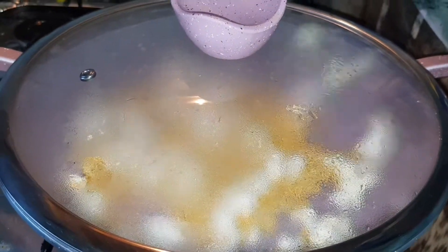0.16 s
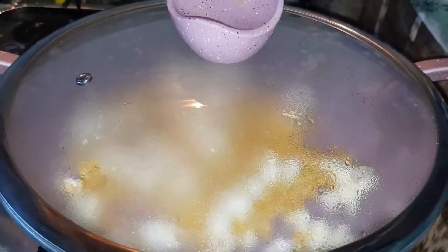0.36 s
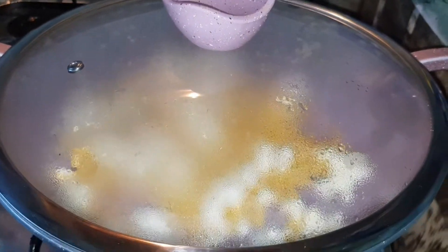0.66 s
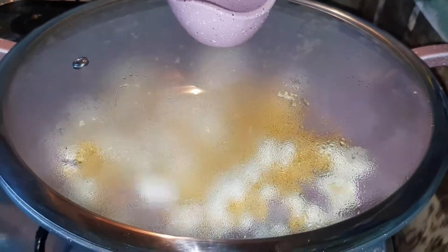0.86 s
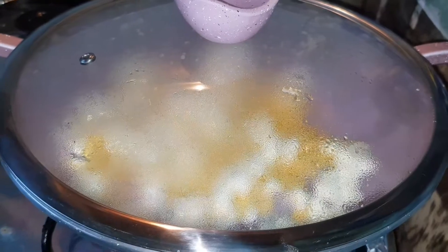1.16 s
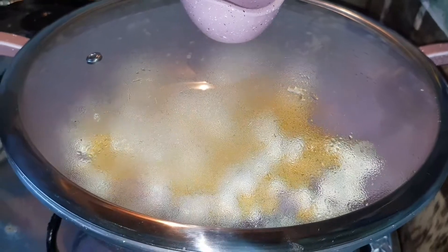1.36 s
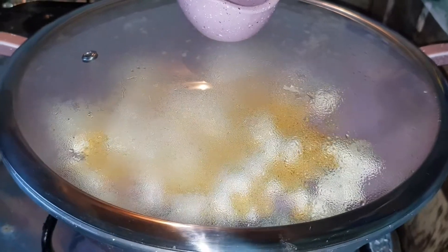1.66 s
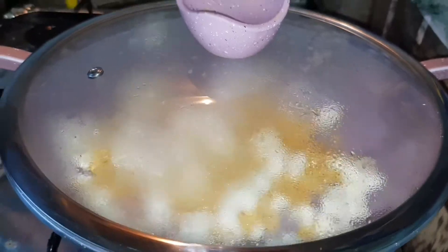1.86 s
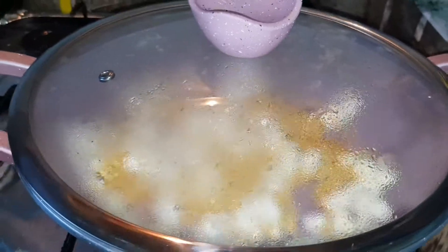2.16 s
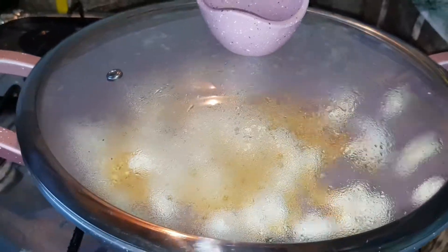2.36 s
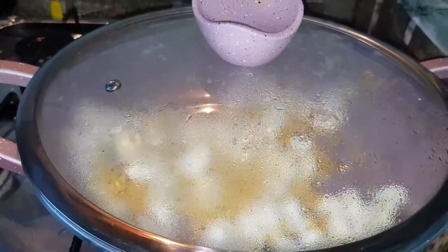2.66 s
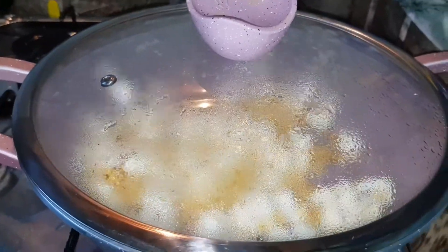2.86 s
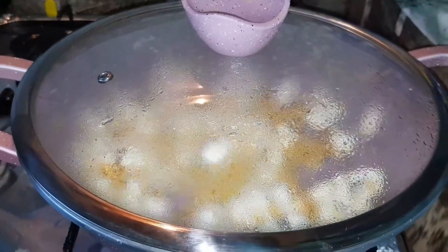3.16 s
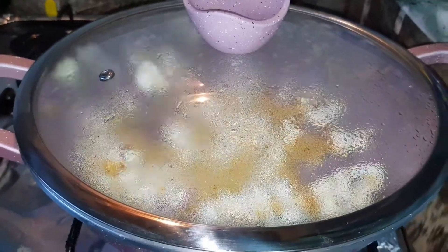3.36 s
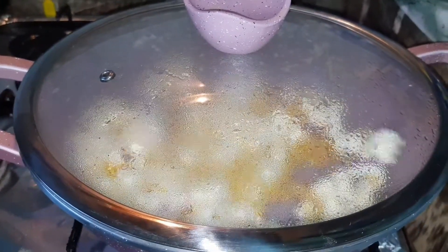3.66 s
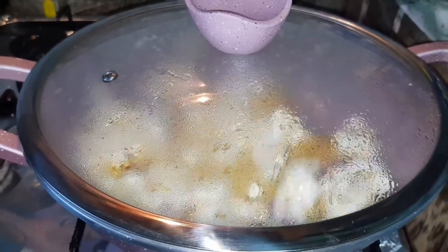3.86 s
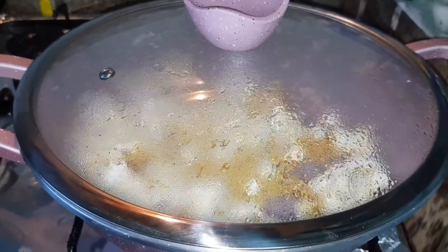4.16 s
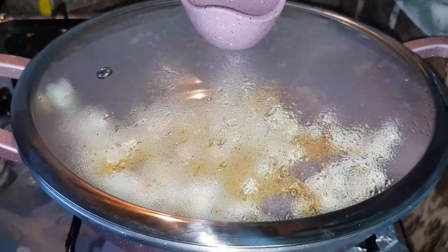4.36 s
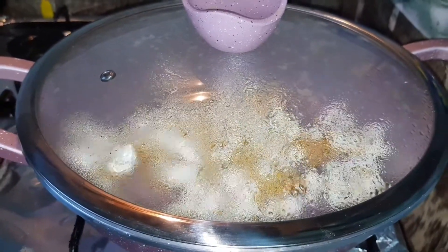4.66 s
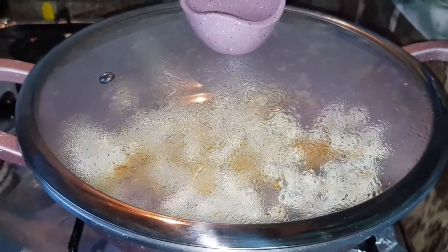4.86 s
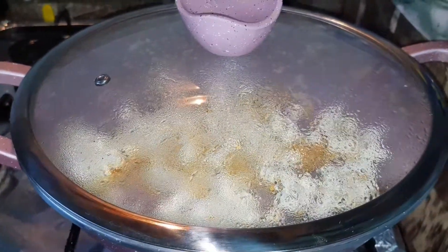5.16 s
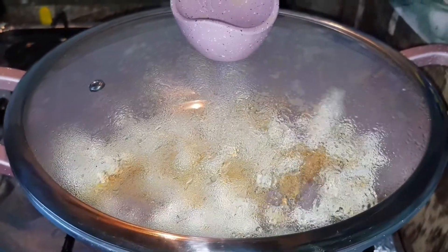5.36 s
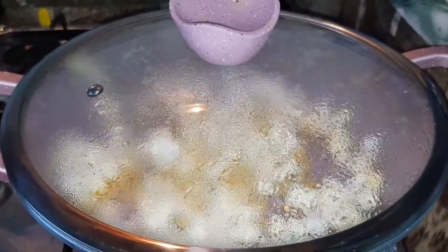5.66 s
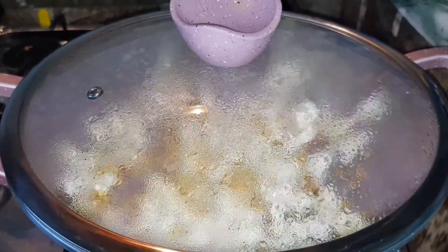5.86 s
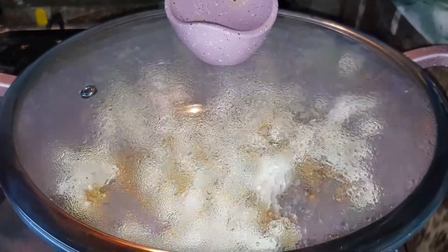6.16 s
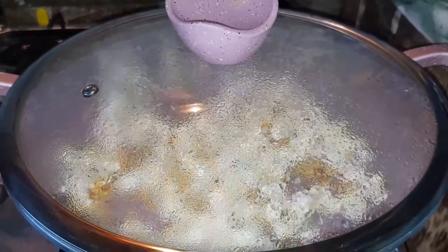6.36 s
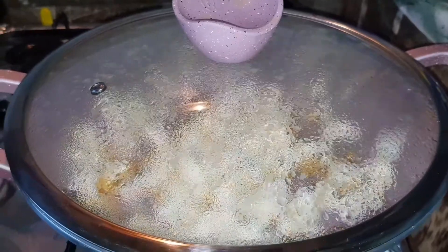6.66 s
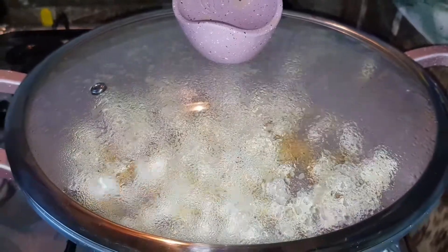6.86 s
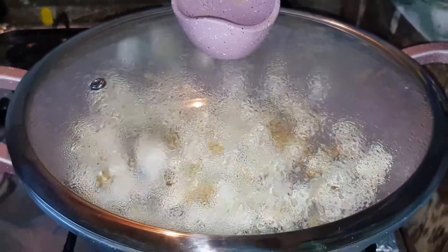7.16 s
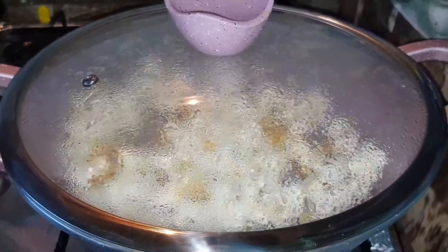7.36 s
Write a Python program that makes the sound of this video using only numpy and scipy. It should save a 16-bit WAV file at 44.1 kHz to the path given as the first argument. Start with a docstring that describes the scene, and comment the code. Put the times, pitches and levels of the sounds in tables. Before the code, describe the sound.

Popcorn pops under a glass lid over a hissing gas stove, scattered at first, then thickening into crowded volleys with sizzle and knocks.

```python
"""Popcorn in a pan under a glass lid in a small kitchen, heard by a phone close by, over a steady gas stove.
A turbulent flame rumbles and oil hisses throughout; lone pops, torn hulls ringing pan and air, come first.
A faint low tone slides down among them; then pops thicken into volleys while the sizzle, shaped noise, swells.
Filtered-noise squeaks and dry snaps join in, kernels clatter on the heap, and modal knocks ring lid and wall.
"""
import sys
import numpy as np
from scipy import signal
from scipy.fft import rfft, irfft, next_fast_len
from scipy.io import wavfile

SR = 44100
rng = np.random.default_rng(int(sys.argv[2]) if len(sys.argv) > 2 else 0)


def to_wav(s):
    """Save 16-bit WAV."""
    ch = np.atleast_2d(s).T  # columns
    pcm = np.round(np.clip(ch, -1, 1) * 32767)  # PCM
    wavfile.write(sys.argv[1], SR, pcm.astype(np.int16))


N = 331632
TAIL = 17640  # samples given to each short sound: 0.4 s
PORT_NULL_HZ = 1340  # above this the ports hear unrelated reflections


def undb(db):
    """Logarithmic level: decibels to amplitude gain."""
    return 10 ** (np.asarray(db) / 20)


def rfft_hz(size):
    """Discrete Fourier analysis: frequencies of a spectrum's bins."""
    return np.arange(size // 2 + 1) * SR / size


def colour(points, f):
    """Spectral envelope: gain of a (Hz, dB) outline on a log-frequency axis."""
    hz, db = np.transpose(points)
    return undb(np.interp(np.log(f + 1), np.log(hz), db))


def unit(x):
    """Power normalization: each stereo sound scaled to rms 1."""
    return x / np.sqrt(np.mean(x ** 2, axis=(-2, -1), keepdims=True))


def fade(t, t60):
    """Exponential damping: 60 dB of decay in t60, scaled to unit energy."""
    env = np.exp(-np.log(1000) * t / t60)
    return env / np.linalg.norm(env)


def at_ports(spectra, f, bass_likeness=0.96):
    """Diffuse-field coherence: two unrelated spectra become two port signals alike in the bass only."""
    relative_f = f / PORT_NULL_HZ
    alike = bass_likeness * np.sinc(relative_f) / (1 + (relative_f / 2) ** 2)
    mid = spectra[..., 0, :] * np.sqrt(1 + alike)
    side = spectra[..., 1, :] * np.sqrt(1 - alike)
    return np.stack([mid + side, mid - side], axis=-2)


def place(times, sounds):
    """Linear superposition: stereo sounds added at their times."""
    out = np.zeros((2, N + 2 * TAIL))
    for s, sound in zip(times, sounds):
        start = max(int(s * SR), 0)
        out[:, start:start + TAIL] += sound
    return out[:, :N]


# broad colour of flame and hot oil: (frequency [Hz], relative level per Hz [dB])
STOVE_COLOUR = [(15, -41), (25, -14), (86, -0.5), (261, 2), (352, -2), (437, -1.5), (637, -3), (1010, -4),
                (1220, -7), (1320, -6), (1780, -9.5), (2460, -18), (4820, -8.5), (8050, -19), (15800, -13)]
# hiss bands of the gas jet: (frequency [Hz], width [Hz], gain [dB])
JET_BANDS = [(2850, 590, 6), (4740, 36, 5.5), (11530, 220, 5.5)]
# how hard the oil sizzles: (time [s], relative level [dB])
SIZZLE_COURSE = [(0, -2), (.6, -2), (1.45, -0.5), (1.62, 3.5), (1.8, 0.5), (2.2, 4), (2.7, 9.5), (3.3, 4),
                 (3.75, 1), (4.6, 4), (5.1, 0), (5.5, 3), (6.3, 3), (7.5, 2.5)]


def stove(level_db=-46.5, flutter_db=1.5, oil_edge_hz=1500, spatter_db=-5, spatter_rate_hz=260,
          spatter_spread_db=6):
    """Turbulence noise: flame rumble and jet hiss, with sizzle and random droplet impulses in the treble."""
    t, f = np.arange(N) / SR, rfft_hz(N)
    flutter = np.interp(t, np.linspace(0, N / SR, num=120), rng.standard_normal(120))
    hiss = rng.standard_normal((2, N)) * undb(flutter_db * flutter)

    sizes = np.minimum(rng.exponential(size=N), 3)
    droplets = (rng.random(N) < spatter_rate_hz / SR) * undb(spatter_spread_db * sizes)
    droplet_sound = rng.standard_normal((2, TAIL)) * fade(t[:TAIL], 0.017)
    spatter = signal.fftconvolve(droplets[None], droplet_sound, axes=1)[:, :N]
    sizzle_gain = undb(np.interp(t, *np.transpose(SIZZLE_COURSE)))
    oil = (hiss + undb(spatter_db) * unit(spatter)) * sizzle_gain

    treble = f ** 2 / (f ** 2 + oil_edge_hz ** 2)
    mixture = rfft(hiss) * (1 - treble) + rfft(oil) * treble
    # the jet's bands colour flame and oil alike
    jet = 1 + sum(undb(db) / (1 + 2j * (f - hz) / width) for hz, width, db in JET_BANDS)
    spectra = mixture * jet * colour(STOVE_COLOUR, f)
    return undb(level_db) * unit(irfft(at_ports(spectra, f), N))


def low_tone(start_s=0.333, end_s=0.607, from_hz=297, to_hz=238, peak_db=-46.0):
    """Frequency glide: the phase of a faint low tone is the running sum of its falling pitch."""
    progress = np.clip((np.arange(N) / SR - start_s) / (end_s - start_s), 0, 1)
    hz = from_hz + (to_hz - from_hz) * progress
    envelope = np.sin(np.pi * progress ** 0.49)
    return undb(peak_db) * envelope * np.sin(2 * np.pi * np.cumsum(hz) / SR)


# fresh popcorn squeaking as it swells against its neighbours: (time [s], pitch [Hz], level [dB])
SQUEAK_EVENTS = [(2.206, 6300, -61.5), (2.66, 6500, -56), (3.197, 5850, -45.5), (3.483, 6200, -52),
                 (5.783, 5800, -40), (6.485, 6300, -57)]


def squeaks(swell_s=0.0072, width_hz=600):
    """Friction noise: swelling starch rubs, and a narrow resonance turns the rub into a rough squeak."""
    t, f, sounds = np.arange(TAIL) / SR, rfft_hz(TAIL), []
    for _, hz, db in SQUEAK_EVENTS:
        rub = rfft(rng.standard_normal((2, TAIL)) * t * np.exp(-t / swell_s))
        resonance = 1 / (1 + 1j * (f - hz) / width_hz) ** 2
        sounds.append(undb(db) * unit(irfft(rub * resonance)))
    return place([row[0] for row in SQUEAK_EVENTS], sounds)


def knocks(hits, modes, detune=0.0064, port_spread_rad=0.68):
    """Modal vibration: a flying kernel sets damped modes ringing, in a different phase at each port."""
    t, sounds = np.arange(TAIL) / SR, []
    for _, db in hits:
        ring = 0
        for hz, t60, gain_db in modes:
            struck_hz = hz * rng.normal(1, detune)
            phase = rng.normal(0, port_spread_rad, (2, 1))
            ring = ring + undb(gain_db) * fade(t, t60) * np.sin(2 * np.pi * struck_hz * t + phase)
        sounds.append(undb(db) * unit(ring))
    return place([s for s, _ in hits], sounds)


# kernels that hit the pan wall: (time [s], level [dB])
WALL_HITS = [(.072, -59), (1.215, -48), (1.841, -43.5), (3.333, -47.5), (3.999, -48.5), (4.187, -46),
             (6.901, -50)]
# modes of the pan wall: (frequency [Hz], t60 [s], relative level [dB])
WALL_RING = [(966, 0.11, 15), (1523, 0.13, 5), (2120, 0.27, -27)]


def wall_knocks():
    """Modal vibration of the pan wall under the impact of kernels."""
    return knocks(WALL_HITS, WALL_RING)


# kernels that hit the lid: (time [s], level [dB])
LID_HITS = [(.163, -52), (3.815, -64), (4.385, -64), (4.587, -54.5), (5.222, -52.5), (5.405, -54.5),
            (5.767, -40), (6.12, -40), (6.15, -56)]
# modes of the glass lid: (frequency [Hz], t60 [s], relative level [dB])
LID_RING = [(664.4, 0.087, 0.5), (700, 0.061, -7), (817, 0.11, -18), (2186, 0.047, -8), (2500, 0.2, -14.5)]


def lid_knocks():
    """Modal vibration of the glass lid under the impact of kernels."""
    return knocks(LID_HITS, LID_RING)


# the hardest snaps of hulls: (time [s], centre frequency [Hz], level [dB])
SNAP_EVENTS = [(0.0775, 12900, -42), (1.216, 3470, -41.5), (1.842, 3000, -50), (2.482, 12300, -45),
               (2.567, 2740, -57), (3.084, 4470, -47), (3.352, 9100, -54), (3.813, 3840, -43),
               (4.373, 13100, -48), (5.115, 7900, -55), (5.6969, 2820, -54), (5.7418, 4170, -41.5),
               (5.765, 3700, -39), (5.917, 4060, -59), (6.119, 2160, -49), (6.346, 3550, -48.5),
               (6.758, 10800, -42)]


def snaps(t60=0.013, sharpness=4.9):
    """Impulsive fracture: a hard hull splits in a dry click, a noise burst through a resonant band-pass."""
    t, f, sounds = np.arange(TAIL) / SR, rfft_hz(TAIL), []
    for _, hz, db in SNAP_EVENTS:
        click = rfft(rng.standard_normal((2, TAIL)) * fade(t, t60))
        hull = 1j * f / hz / (1 - (f / hz) ** 2 + 1j * f / hz / sharpness)
        sounds.append(undb(db) * unit(irfft(at_ports(click, f) * hull)))
    return place([row[0] for row in SNAP_EVENTS], sounds)


def balanced_parts(times, swell, db, parts_db):
    """Fixed spectral balance: rows of (time, swell, thump, ring, crack, spit) sharing one set of offsets."""
    return np.column_stack([times, swell] + [db + part_db for part_db in parts_db])


# popcorn thrown against the pan and the heap: (time [s], swell of the clatter [s], reference level [dB])
TUMBLE_EVENTS = [(.42, 0.01, -64), (1.742, .007, -61), (2.087, 0.0094, -53.5), (2.537, 0.0063, -48),
                 (2.558, 0.0024, -43), (2.636, 0.011, -52.5), (2.711, 0.009, -49), (3.116, .002, -52.5),
                 (3.165, 0.00046, -54.5), (3.199, 0.0004, -60), (3.417, 0.00044, -52.5),
                 (3.812, 0.00054, -43.5), (5.02, 0.0056, -61), (5.141, .006, -56), (5.215, 0.00044, -53),
                 (5.698, 0.00054, -42.5), (5.738, 0.0092, -43.5), (5.765, 0.00019, -40.5),
                 (5.774, 0.0092, -45), (6.118, 0.00033, -43.5), (6.974, 0.0042, -44), (7.077, .008, -49)]
# its thump, ring, crack and spit against the reference level [dB]: hardly any steam
TUMBLE_BALANCE = (-5.5, 0.5, 1.5, -14.5)


def tumbles():
    """Impact excitation: popcorn clatters on pan and heap with little steam noise."""
    return balanced_parts(*np.transpose(TUMBLE_EVENTS), TUMBLE_BALANCE)


# hulls that only split and spit steam: (time [s], swell of the jet [s], reference level [dB])
SPIT_EVENTS = [(.075, .001, -46.5), (.140, 0.0037, -48), (.192, .0016, -51.5), (.230, 0.0025, -55),
               (.708, 0.0008, -56), (1.020, 0.0023, -50.5), (2.351, 0.0076, -52.5), (2.838, 0.0098, -46),
               (3.489, .006, -53), (3.84, 0.013, -46), (4.423, 0.0067, -51), (4.478, 0.00088, -46),
               (4.585, 0.0043, -53), (5.998, 0.0017, -45), (6.323, 0.0051, -51), (6.369, 0.00087, -44.5),
               (6.66, 0.0052, -43), (6.834, 0.021, -51)]
# their thump, ring, crack and spit against the reference level [dB]
SPIT_BALANCE = (-10, -8.5, -6, -0.5)


def spits():
    """Jet noise: steam escapes from a split hull, so the treble dominates."""
    return balanced_parts(*np.transpose(SPIT_EVENTS), SPIT_BALANCE)


# kernels that burst: (time [s], swell of the burst [s], reference level [dB], reference thump on the pan [dB])
BURST_EVENTS = [(0.067, 0.0025, -47, -57), (.135, 0.0082, -56, -46.5), (.161, .008, -48, -54.5),
                (0.359, .005, -54.5, -60.5), (.733, 0.011, -47, -45), (.765, 0.0024, -48.5, -48.5),
                (.999, 0.0022, -47, -49), (1.211, 0.0049, -45, -47.5), (1.394, 0.007, -50.5, -47),
                (1.818, 0.015, -49.5, -56), (1.8393, 0.0024, -41.5, -46.5), (1.932, 0.0002, -49, -39.5),
                (2.045, 0.0045, -54, -50.5), (2.291, .016, -49, -42.5), (2.364, 0.0039, -43, -41),
                (2.396, 0.0014, -43.5, -38), (2.4804, 0.00094, -42.5, -46.5), (2.608, 0.0068, -47, -43.5),
                (2.678, 0.0057, -50, -69), (2.777, 0.0091, -48, -49.5), (2.857, 0.0058, -46, -51.5),
                (2.963, 0.011, -55, -51.5), (3.055, 0.01, -41, -50.5), (3.323, 0.009, -45.5, -41.5),
                (3.352, 0.0015, -40.5, -45), (3.51, 0.0022, -49, -43.5), (3.581, 0.0041, -52.5, -56.5),
                (3.795, 0.0093, -49, -61), (3.998, 0.0022, -49.5, -45), (4.185, 0.0022, -45.5, -47.5),
                (4.348, 0.0065, -47, -46.5), (4.561, 0.01, -58, -59), (4.66, .009, -63, -54),
                (4.700, 0.0021, -52.5, -48), (4.812, 0.0041, -50, -57), (4.867, 0.0056, -51.5, -49.5),
                (5.112, 0.0018, -49.5, -52.5), (5.196, 0.006, -56, -46.5), (5.332, 0.021, -53, -50),
                (5.366, .003, -51.5, -46.5), (5.642, 0.011, -51.5, -47.5), (5.693, 0.017, -46.5, -55),
                (5.814, 0.014, -46.5, -44.5), (5.8903, .0006, -51, -43.5), (5.909, 0.0046, -47, -43.5),
                (5.96, 0.024, -48, -56.5), (6.061, 0.0078, -41.5, -55), (6.091, .016, -52, -43),
                (6.151, 0.0046, -46, -48), (6.343, 0.0066, -43, -46), (6.408, 0.01, -53, -53.5),
                (6.526, 0.0051, -44.5, -44.5), (6.54, 0.023, -44, -43.5), (6.595, 0.00059, -52.5, -46),
                (6.635, .006, -48.5, -60), (6.756, 0.00047, -43.5, -43.5), (6.893, .006, -47.5, -45.5),
                (6.914, 0.0046, -43.5, -51), (6.963, .0086, -46.5, -43.5), (7.063, 0.0013, -44.5, -48),
                (7.124, 0.0072, -51, -45.5), (7.191, 0.011, -46.5, -49), (7.248, 0.0012, -50, -47),
                (7.43, 0.0045, -48.5, -51)]


def bursts(ring_db=-1.5, crack_db=1.5, spit_db=1, ring_from_thump=0.29,
           usual_swell_s=0.0068, brighter_db_per_octave=1.3):
    """Rise time and bandwidth: each halving of the swell gives more spit and less ring."""
    times, swell, db, thump_db = np.transpose(BURST_EVENTS)
    bright_db = brighter_db_per_octave * np.log2(usual_swell_s / np.maximum(swell, 1e-4))
    # a share of the hollow ring follows the thump
    ring = db + ring_db + ring_from_thump * (thump_db - db) - bright_db
    return np.column_stack([times, swell, thump_db, ring, db + crack_db, db + spit_db + bright_db])


def landings(count=13, shortest_s=0.03, longest_s=0.11, softer_db=-17.5, longest_swell_s=0.0034):
    """Ballistic delay: some popped kernels fly up and drop back onto the heap, later and softer."""
    times, _, db, _ = np.transpose(BURST_EVENTS)[:, rng.permutation(len(BURST_EVENTS))[:count]]
    flight, pace = rng.random((count, 2)).T
    landing_times = times + shortest_s + (longest_s - shortest_s) * flight
    return balanced_parts(landing_times, longest_swell_s * pace, db + softer_db, TUMBLE_BALANCE)


# resonances of the pan and the air under the lid:
# (frequency [Hz], width [Hz], mean gain over the broad colour [dB])
PAN_RESONANCES = [(71, 21, 3), (114.3, 38, 9.5), (260.6, 34.2, 22), (287.4, 33, 12.5), (648, 25, 9.5),
                  (974, 33.5, 10), (1598, 47, 12), (2134, 12.5, 11.5), (2340, 66, 7), (2550, 11, -7),
                  (2907, 15, 11), (3300, 50, 5.5), (3550, 120, -4.5), (3980, 150, 5.5), (4870, 390, 1.5),
                  (5677, 130, 7)]
# broad colour of a pop: (frequency [Hz], gain [dB])
POP_OUTLINE = [(25, -15), (60, 6.5), (120, 4.5), (170, -4), (280, -6), (480, -7.5), (850, 1.5), (1250, 0.5),
               (1900, -4), (3200, 1), (6000, 2), (8000, -4.5), (10000, -4), (13500, 2.5)]


def pan_response(f, count, scatter_db=3.0, drift=0.0039, pocket_hz=4200, pocket_width_hz=350,
                 pocket_db=0, wall_echo=0.35):
    """Modal coupling: each kernel's place in the pan sets the strength and sign of every resonance."""
    gains = 1
    for hz, width, db in PAN_RESONANCES:
        strength, sign, detune = rng.standard_normal((count, 3)).T[:, :, None]
        mode_hz = hz * (1 + drift * detune)
        gains = gains + np.sign(sign) * undb(db + scatter_db * strength) / (1 + 2j * (f - mode_hz) / width)
    # air pockets among the popcorn and first echoes off wall and lid give each pop its own colour
    comb = 1
    for _ in range(3):
        size, path = rng.random((count, 2)).T[:, :, None]
        air_hz = pocket_hz * 2 ** (2 * size - 1)
        gains = gains + undb(pocket_db) / (1 + 2j * (f - air_hz) / pocket_width_hz)
        delay_s = 0.00042 + 0.0025 * path
        comb = comb + wall_echo * f / (f + 600) * np.exp(-2j * np.pi * f * delay_s)
    return gains * comb * colour(POP_OUTLINE, f)


# thump, ring, crack and spit: (upper edge [Hz], straight pulse before weakening by slow swell [dB],
# t60 inside the pan [s], t60 of the kitchen [s], kitchen against pan [dB])
POP_PARTS = [(436, 8.5, 0.22, 0.55, -3), (2333, -9, 0.022, 0.19, 5), (7710, -3.5, 0.029, 0.19, 4),
             (15540, -26, 0.023, 0.19, 0.5)]


def pops(grit_db=7.0, snap_share=0.04, snap_delay=0.62, pulse_swell_s=0.005, trim_db=0.28):
    """Random-impulse reverberation: a hull tears in tiny snaps and a big one that echo in pan and kitchen."""
    times, swell, *levels = np.vstack([bursts(), spits(), tumbles(), landings()]).T
    count, t, f = len(times), np.arange(TAIL) / SR, rfft_hz(TAIL)
    swell = np.maximum(swell, 1e-4)[:, None]
    age = t / swell
    grit = undb(grit_db * rng.standard_normal((count, TAIL)))
    tearing = (age * np.exp(-age) * grit) ** 2
    # the big snap comes as the steam nears full force
    snap = np.arange(TAIL) == np.argmax(age > snap_delay, axis=1)[:, None]
    energy = rfft(tearing / tearing.sum(axis=1, keepdims=True) + snap_share * snap)
    # its pressure pulse reaches both ports together, and is weaker when the hull opens slowly
    pulse = snap / (1 + swell / pulse_swell_s)
    pan = pan_response(f, count)[:, None]
    reflections = rng.standard_normal((count, 2, TAIL))
    end_taper = np.minimum(1, 2 - 2 * t / t[-1]) ** 2

    sounds, low = 0, 22
    for (high, pulse_db, pan_t60, room_t60, room_db), db in zip(POP_PARTS, levels):
        decay = fade(t, pan_t60) ** 2 + (undb(room_db) * fade(t, room_t60)) ** 2
        # the kernel moves as it bursts, so the echoes of its snaps add up in power
        echo_power = np.abs(irfft(energy * rfft(decay)))
        field = reflections * np.sqrt(echo_power)[:, None]
        field[:, 0] += undb(pulse_db) * pulse
        band_filter = signal.butter(4, [low, high], "band", fs=SR, output="sos")
        band = signal.sosfreqz(band_filter, f, fs=SR)[1]
        part = irfft(at_ports(rfft(field), f) * (pan * band)) * end_taper
        sounds = sounds + unit(part) * undb(db + trim_db)[:, None, None]
        low = high
    return place(times, sounds)


def scene():
    """Linear superposition: stove, tone, squeaks, knocks, snaps and pops add up."""
    background = stove() + low_tone()
    return background + squeaks() + wall_knocks() + lid_knocks() + snaps() + pops()


# the two microphone ports: (frequency [Hz], left minus right [dB])
PORT_DIFFERENCE = [(450, -0.5), (630, -1.5), (850, -0.5), (1300, -1.5), (2300, 0), (3300, -4), (4500, -2),
                   (5700, -6.5), (7200, -0.5), (8200, 7), (9600, 5), (11000, -5.5), (15000, -2)]


def record(dry, top_hz=15750):
    """Linear filtering: each port colours the sound in its own way, and the phone cuts the top."""
    size = next_fast_len(N + TAIL)
    ratio = colour(PORT_DIFFERENCE, rfft_hz(size))
    # the two ports' power gains always sum to 2
    gains = np.array([ratio, np.ones_like(ratio)]) * np.sqrt(2 / (1 + ratio ** 2))
    heard = irfft(rfft(dry, size) * gains, size)[:, :N]
    low_pass = signal.ellip(10, 0.2, 70, top_hz, fs=SR, output="sos")
    return signal.sosfilt(low_pass, heard)


dry = scene()
out = record(dry)
to_wav(out)
```